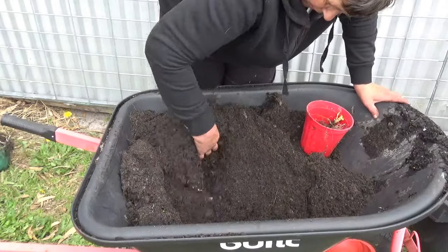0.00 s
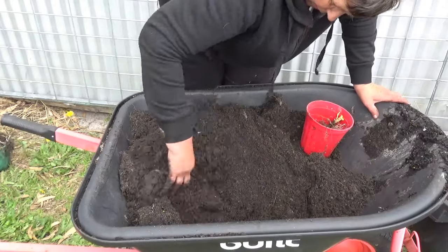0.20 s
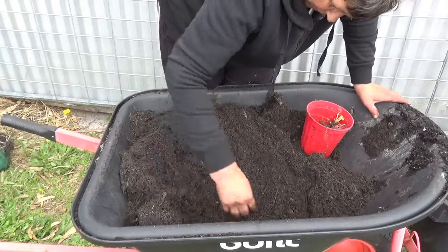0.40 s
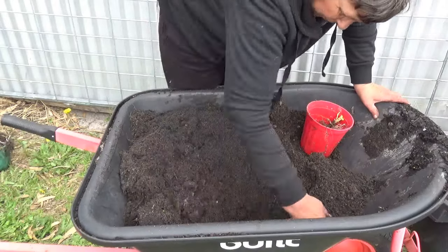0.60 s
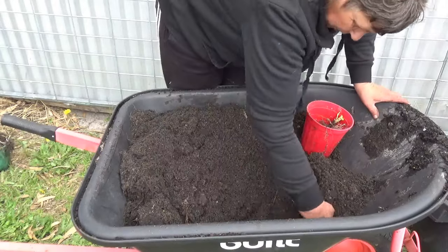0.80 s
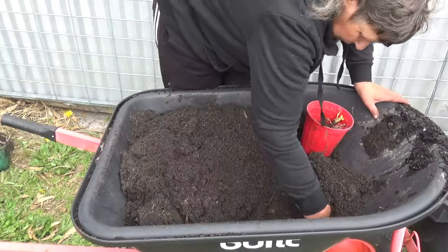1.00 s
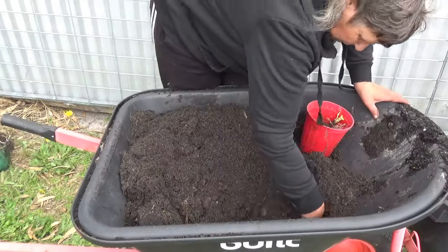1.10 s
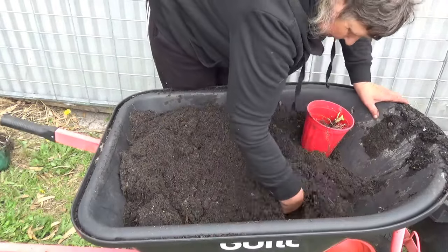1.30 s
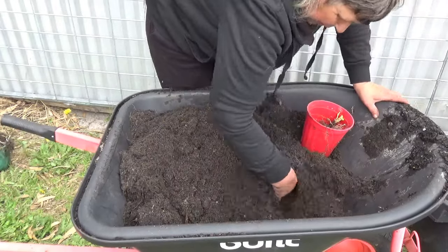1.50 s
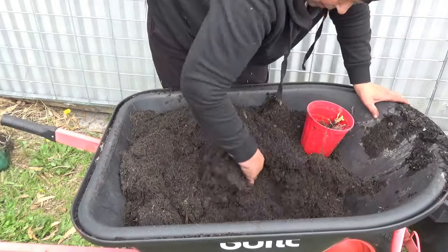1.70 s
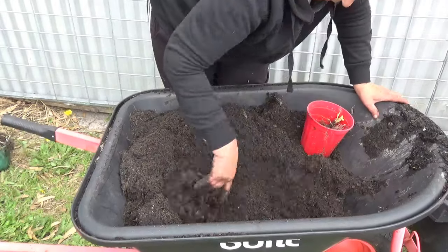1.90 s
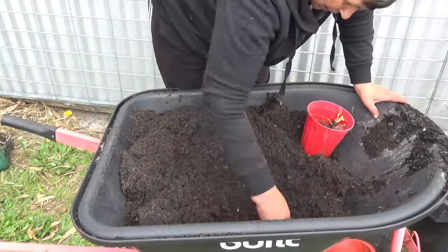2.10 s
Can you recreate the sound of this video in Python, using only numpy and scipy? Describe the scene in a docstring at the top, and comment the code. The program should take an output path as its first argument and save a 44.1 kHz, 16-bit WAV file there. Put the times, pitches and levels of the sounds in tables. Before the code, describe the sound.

A bare hand digs through loose potting mix in a plastic tub, with one sharp snap

```python
"""Hand digging in potting mix

A bare hand digs and sweeps through loose potting mix in a plastic wheelbarrow outdoors.
Dense random clicks make the rustle of grit; clicked resonances make pattering crumbs, the ringing tub,
dull taps, bright ticks and one sharp snap of bark; a finger's wipe is noise round a moving pitch.
Birds whistle as gliding sines with a yard echo, and a far buzz sounds over a soft hush of noise bands.
"""
import sys
import numpy as np
from scipy import signal
from scipy.fft import rfft, irfft
from scipy.io import wavfile

SR = 44100
rng = np.random.default_rng(int(sys.argv[2]) if len(sys.argv) > 2 else 0)


def gain_from_db(level_db):
    """Convert decibel levels to linear amplitude factors (20 dB per decade)."""
    decades = np.asarray(level_db, float) / 20
    return 10 ** decades


def wav_out(sig):
    """Save sig, one row per channel (or a flat mono array), as 16-bit PCM at SR to the path in sys.argv[1]."""
    wavfile.write(sys.argv[1], SR, np.round(np.clip(np.atleast_2d(sig).T, -1, 1) * 32767).astype(np.int16))


N = 97020
T = np.arange(N) / SR


def rms_one(x):
    """Scale to rms 1."""
    return x / np.sqrt(np.mean(x ** 2) + 1e-20)


def in_time(rows):
    """Turn breakpoints into curves, one value a sample for each column after the time."""
    s, *columns = np.transpose(rows)
    return [np.interp(T, s, column) for column in columns]


def at_hz(points, hz):
    """Read a spectrum on a log frequency axis."""
    points = np.array(points)
    return np.interp(np.log(hz), np.log(points[:, 0]), points[:, 1])


def drift(rate_hz):
    """Slow random curve of rms 1: noise through two equal one-pole lowpasses."""
    step = 40  # samples between the points of the curve
    r = np.exp(-2 * np.pi * rate_hz * step / SR)
    settle = 2000  # points dropped while the filter settles
    white = rng.standard_normal(N // step + settle + 2)
    slow = signal.lfilter([1], [1, -2 * r, r * r], white)[settle:]
    return np.interp(np.arange(N) / step, np.arange(len(slow)), rms_one(slow))


def ring(clicks, hz, t60_s):
    """Two-pole resonator: a unit click starts a decaying sine of height about 1."""
    r, w = gain_from_db(-60 / (t60_s * SR)), 2 * np.pi * hz / SR
    return signal.lfilter([0, np.sin(w)], [1, -2 * r * np.cos(w), r * r], clicks + 1e-18)


def pan(x, db):
    """Place in stereo; db is left minus right."""
    return x * gain_from_db(np.array([[db / 2], [-db / 2]]))


def low_cut(x, hz):
    """Steep cut below hz."""
    return signal.sosfilt(signal.butter(3, hz, "high", fs=SR, output="sos"), x)


def grains(rate_per_s, spread_db):
    """Random clicks of either sign and uneven size."""
    size = gain_from_db(spread_db * np.minimum(rng.exponential(1, N), 5))
    return size * rng.choice([-1, 1], N) * (rng.random(N) < rate_per_s / SR)


def moving_band(rows, width_hz, pan_db):
    """Lowpassed noise pair turned up to a moving centre: a hiss with a gliding pitch."""
    hz, db = in_time(rows)
    lowpass = signal.butter(2, width_hz / 2, fs=SR, output="sos")
    low = signal.sosfilt(lowpass, rng.standard_normal((2, N)))
    phase = 2 * np.pi * np.cumsum(hz) / SR
    band = low[0] * np.cos(phase) + low[1] * np.sin(phase)
    return pan(rms_one(band) * gain_from_db(db), pan_db)


def contacts(rows, cycles):
    """Each contact rings three neighbouring pitches for a few cycles, with little far below them."""
    out = np.zeros((2, N))
    detune = rng.uniform(-1, 1, (len(rows), 3))
    click = np.r_[1., np.zeros(2500)]
    for (s, db, hz, pan_db), shifts in zip(rows, detune):
        y = 0
        for ratio, shift, gain in zip((.8, 1, 1.22), shifts, (.6, 1, .6)):
            pitch = min(hz * ratio * (1 + 0.027 * shift), 11500)
            y = y + ring(click, pitch, cycles / hz) * gain
        y = low_cut(y, .75 * hz)
        peak = np.abs(y).argmax()
        i = int(s * SR) - peak  # the peak falls on the listed time
        hit = pan(y / np.abs(y[peak]) * gain_from_db(db), pan_db)
        out[:, i:i + len(y)] += hit[:, :N - i]
    return out


def soil():
    """Fine grit hisses past the fingers, coarse crumbs patter, the tub wall rings under the pour."""
    # effort of the hand: t/s, fine rustle level/dB, coarse crumb level/dB
    hand = [(0, -73.5, -65), (.31, -63.5, -75), (.35, -56, -57.5), (.40, -56, -62), (.48, -60, -70),
            (.69, -65, -68), (.73, -52.5, -65), (.76, -45.5, -52), (.86, -46.5, -53), (.94, -48, -61.5),
            (1.0, -55.5, -54), (1.25, -57.5, -59.5), (1.4, -59, -58.5), (1.7, -63, -67), (2.05, -102, -79),
            (2.065, -50, -59), (2.09, -65, -64), (2.11, -50, -53), (2.16, -60, -61), (2.2, -49, -50)]
    # spectrum of the fine rustle: f/Hz, density level/dB
    rustle = [(1200, -22), (2000, -5), (2800, -4.5), (3600, -5.5), (5500, -8), (7500, -8), (9500, -10.5),
              (12000, -13)]
    # crumbs pouring on the tub wall: t/s, level/dB
    pour = [(.74, -69), (.76, -49.5), (.79, -56.5), (.82, -54), (.87, -45), (.89, -58), (.95, -57),
            (1.0, -69.5)]
    # resonances of the tub wall: f/Hz, bandwidth/Hz
    wall_modes = [(1290, 53), (1380, 79), (1450, 210), (1570, 110)]
    fine_db, coarse_db = in_time(hand)

    grit = grains(11000, spread_db=3.5)
    colour = gain_from_db(at_hz(rustle, np.fft.rfftfreq(N, 1 / SR) + 1))
    fine = rms_one(irfft(rfft(grit) * colour, N)) * gain_from_db(fine_db + 0.65 * drift(37))

    # each crumb is dealt one of 16 pitches and rings 6 cycles to -60 dB
    crumbs, dealt = grains(1500, spread_db=3.0), rng.integers(0, 16, N)
    coarse = 0
    for k, hz in enumerate(np.geomspace(193, 1800, num=16)):
        coarse = coarse + ring(crumbs * (dealt == k), hz, 6 / hz) * (hz / 1000) ** 1.32
    coarse = rms_one(low_cut(coarse, 140)) * gain_from_db(coarse_db)

    # a bandwidth of b Hz dies by 60 dB in 2.2 / b seconds
    wall = sum(ring(grains(600, spread_db=3.5), hz, 2.2 / width) for hz, width in wall_modes)
    wall = rms_one(low_cut(wall, 1220)) * gain_from_db(in_time(pour)[0])
    return pan(fine + coarse + wall, -1.5)


def snap():
    """A bark chip cracks: one click rings its modes, a faint click leads it by a fraction of a millisecond,
    returns from the tub follow, a short hiss dies."""
    # the crack: t/s, peak level of the ringing/dB, pan/dB
    s, db, pan_db = (.5194, -10.5, 2.5)
    # modes of the chip: f/Hz, level/dB, t60/s
    modes = [(1600, -33, 0.0026), (2400, -18, 0.0025), (3240, -2.5, 0.0037), (3890, 0, 0.00416),
             (4770, 1, 0.0032), (6320, -1.5, 0.0056), (7930, -7, 0.0049), (8650, -7, 0.0013)]
    # the crack, a faint click just before it, and its returns from the tub: delay/s, level/dB (all but the
    # crack vary by chance)
    returns = np.array([(0, 0), (-.0004, -14), (.0007, -11), (.0018, -15), (.0032, -14), (.006, -17),
                        (.0073, -15), (.0085, -18), (.015, -25)])
    delays_s, returns_db = returns.T
    tail_db, tail_t60_s = -23, .07

    crack = 0
    for hz, level_db, t60_s in modes:
        chance_db = rng.normal(0, 3, len(returns)) * (delays_s != 0)
        clicks = np.zeros(N)
        clicks[((s + delays_s) * SR).astype(int)] = gain_from_db(returns_db + level_db + chance_db)
        crack = crack + ring(clicks, hz, t60_s)
    crack = low_cut(crack, 1500)
    # unit peak, moved onto the time of the snap
    crack = np.roll(crack / np.abs(crack).max(), int(s * SR) - np.abs(crack).argmax())

    bandpass = signal.butter(2, [1800, 8000], "band", fs=SR, output="sos")
    mid, side = signal.sosfilt(bandpass, rng.standard_normal((2, N)))
    decay = (T > s) * gain_from_db(tail_db - 60 * np.maximum(T - s, 0) / tail_t60_s)
    tail = (mid + 0.36 * side * [[1], [-1]]) * decay
    return pan(crack + tail, pan_db) * gain_from_db(db)


def taps():
    """Lumps knock dully on the tub: low pitches that die in a few cycles."""
    # t/s, peak level/dB, centre f/Hz, pan/dB
    lumps = [(.3325, -45.5, 600, 0), (.343, -39, 1410, 2.5), (.3515, -41.5, 1310, 6.5), (.354, -43, 604, 1),
             (.3585, -47, 547, 2), (.366, -37.5, 1500, 3), (.368, -47.5, 620, 2.5), (.3908, -45, 1190, 5.5),
             (.3945, -42.5, 750, 0), (.4105, -46, 712, 2), (.437, -45, 570, 0), (.5222, -38.5, 630, -1),
             (.5226, -43, 840, -1), (.5265, -42.5, 760, 1), (.756, -45, 543, -0.5), (.787, -46, 650, 0),
             (.82, -51, 194, 1.5), (.846, -49.5, 201, 1.5), (.96, -51, 447, 6), (2.064, -41, 1410, 1.5),
             (2.1153, -35.5, 1004, 1), (2.1173, -38.5, 1120, 3), (2.1197, -40, 850, 0),
             (2.138, -40, 1340, 1), (2.143, -46, 1010, 4), (2.18, -49.5, 427, 0)]
    return contacts(lumps, cycles=5.0)


def ticks():
    """Hard bits of grit tick brightly: high pitches that ring for more cycles."""
    # t/s, peak level/dB, centre f/Hz, pan/dB
    bits = [(.3561, -33.5, 4960, 4.5), (.3651, -30.5, 6200, 5), (.372, -51.5, 5000, 1),
            (.391, -37, 5500, 1.5), (.3932, -31.5, 5160, 4.5), (.394, -49, 5940, 1.5),
            (.4035, -39, 8500, 1), (.435, -47, 7500, 0), (1.121, -39.5, 8500, -3), (2.0638, -26, 8700, 1),
            (2.075, -34, 8000, 5), (2.1008, -36, 9000, 5), (2.107, -47, 7000, 0), (2.1152, -44.5, 9500, 5),
            (2.187, -39, 8500, 7)]
    return contacts(bits, cycles=10.0)


def finger_wipe():
    """A finger wipes along the plastic: a hiss that rises."""
    # t/s, centre f/Hz, level/dB
    stroke = [(1.27, 2400, -61), (1.29, 2900, -56), (1.31, 3900, -49), (1.335, 4400, -49.5),
              (1.352, 4700, -53), (1.365, 4500, -54), (1.4, 4500, -72.5)]
    return moving_band(stroke, width_hz=1270, pan_db=7.5)


def whistle(rows, pan_db):
    """A sine follows pitch and level, with soft edges."""
    hz, db = in_time(rows)
    edge_s = 0.011
    edge = np.clip(np.minimum(T - rows[0][0], rows[-1][0] - T) / edge_s + .5, 0, 1)
    tone = np.sin(2 * np.pi * np.cumsum(hz) / SR + rng.uniform(0, 2 * np.pi))
    return pan(np.sqrt(2) * edge * gain_from_db(db) * tone, pan_db)


def birds():
    """Long whistles and short notes, with a decaying noise echo from the yard."""
    # long whistles: t/s, f/Hz, level/dB
    whistle_a = [(0.395, 2337, -59), (0.403, 2245, -41.5), (0.421, 2057, -46), (0.467, 1985, -42.5),
                 (0.475, 1937, -48.5), (0.521, 1912, -40), (0.573, 1873, -51), (0.585, 1846, -44.5),
                 (0.603, 1848, -56), (0.631, 1812, -52.5), (0.638, 1824, -38.5)]
    whistle_b = [(0.76, 2126, -52.5), (0.768, 2153, -54), (0.79, 2280, -43.5), (0.844, 2189, -38.5),
                 (0.88, 2125, -45.5), (0.886, 2079, -54), (0.924, 2012, -41.5), (0.945, 1976, -51)]
    whistle_c = [(0.323, 3180, -64), (0.336, 3080, -53.5), (.385, 3100, -48), (0.398, 2950, -50),
                 (.408, 2900, -51.5), (.42, 2750, -64)]
    whistle_d = [(1.012, 1686, -60), (1.031, 1700, -54), (1.062, 1600, -48), (1.105, 1565, -59.5),
                 (1.118, 1530, -61), (1.145, 1554, -59), (1.155, 1490, -60)]
    # short and far notes: start t/s, length/s, first f/Hz, last f/Hz, level/dB, pan/dB
    notes = [(.055, .05, 1880, 1850, -58, 0), (.185, .07, 2240, 2180, -48, 0),
             (.56, .09, 2080, 1920, -58, 0), (.64, .025, 1900, 1830, -58, 0),
             (.25, .05, 2560, 2580, -65, 0), (.275, .025, 3560, 3540, -63, 0),
             (.41, .04, 3090, 3090, -61, 0), (.48, .1, 3100, 3090, -66, 0), (.68, .087, 1915, 1850, -52, 0),
             (.752, .045, 3170, 3420, -52, 0), (.82, .07, 2270, 2260, -60, 0),
             (.9, .08, 2250, 2230, -57, 0), (.93, .05, 2100, 2100, -58, 0), (.99, .05, 2200, 2140, -53, 0),
             (1.045, .06, 2090, 2040, -56, 0), (1.745, .04, 690, 680, -62, 0),
             (1.19, .06, 1600, 1550, -64, 0), (1.43, .15, 2170, 2040, -65, 0),
             (1.808, .035, 2150, 2220, -58, 0), (1.87, .045, 2190, 2240, -57, 0),
             (2.138, .02, 4350, 4400, -66, 0), (2.158, .03, 4800, 4950, -68, 0)]
    yard_t60_s, yard_db = 0.24, -10

    calls = sum(whistle(rows, -1) for rows in (whistle_a, whistle_b, whistle_c, whistle_d))
    for s, length, first, last, db, pan_db in notes:
        note = whistle([(s, first, db), (s + length, last, db)], pan_db)
        waver_db = 1.2 + .15 * max(-48.5 - db, 0)  # faint notes waver more in level
        calls = calls + note * gain_from_db(waver_db * drift(30))

    t = T[:SR // 2]
    echo = rng.standard_normal((2, len(t))) * gain_from_db(-60 * t / yard_t60_s) * (t > .012)
    echo = echo / np.sqrt((echo ** 2).sum(axis=1)[:, None])
    return calls + gain_from_db(yard_db) * signal.fftconvolve(calls, echo, axes=1)[:, :N]


def far_buzz():
    """A short far buzz: a narrow band of noise that sinks in pitch."""
    # t/s, centre f/Hz, level/dB
    buzz = [(.12, 2100, -85), (.135, 2100, -58), (.18, 2000, -61), (.2, 1900, -81.5)]
    return moving_band(buzz, width_hz=640, pan_db=-1)


def outdoor_hush():
    """Third-octave noise bands from mid and side sources, each with its level, flicker and likeness."""
    # spectrum of the hush: f/Hz, relative density level/dB
    spectrum = [(25, -35.5), (50, -16.5), (100, -21.5), (200, -16.5), (350, -10.5), (560, -6), (1030, -5.5),
                (1440, -11), (2200, -6.5), (2880, -12.5), (3500, -10.5), (4570, -11), (7000, -15.5),
                (10000, -24), (13000, -26.5)]
    # stereo likeness: f/Hz, left-right likeness (1 = the same)
    likeness = [(60, 0.94), (170, 0.86), (490, 0.86), (1410, 0.33), (4060, 0.59), (11600, 1)]
    white = rng.standard_normal((2, 2, N))  # neighbouring bands take different noise
    out, edges = 0, 25 * 2 ** np.arange(0, 9.1, 1 / 3)
    for k, (bottom, top) in enumerate(zip(edges, edges[1:])):
        bandpass = signal.butter(2, [bottom, top], "band", fs=SR, output="sos")
        mid, side = signal.sosfilt(bandpass, white[k % 2])
        hz = np.sqrt(bottom * top)
        alike = np.clip(at_hz(likeness, hz), -1, 1)
        gain = gain_from_db(at_hz(spectrum, hz) + 1.0 * drift(7.3))  # flickers by 1 dB rms
        out = out + gain * (np.sqrt(1 + alike) * mid + np.sqrt(1 - alike) * side * [[1], [-1]])
    return gain_from_db(-54.5) * rms_one(out)


def scene():
    """All sources over the outdoor hush."""
    digging = soil() + snap() + taps() + ticks() + finger_wipe()
    return digging + birds() + far_buzz() + outdoor_hush()


def low_pass(x):
    """A second steep lowpass removes everything above 12230 Hz."""
    return signal.sosfilt(signal.butter(12, 12230, fs=SR, output="sos"), x)


def record(dry):
    """A steep lowpass takes off the top of the finished mix."""
    lowpass = signal.ellip(12, .5, 50, 11060, fs=SR, output="sos")  # edge at 11060 Hz
    mix = signal.sosfilt(lowpass, dry)
    return low_pass(mix)


dry = scene()
out = record(dry)
wav_out(out)
```